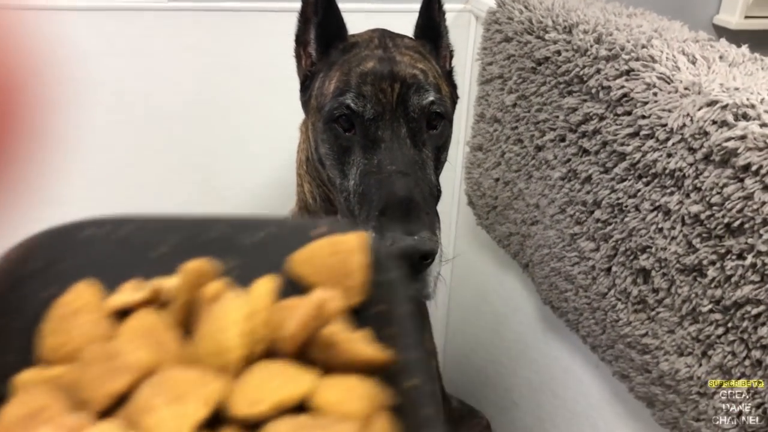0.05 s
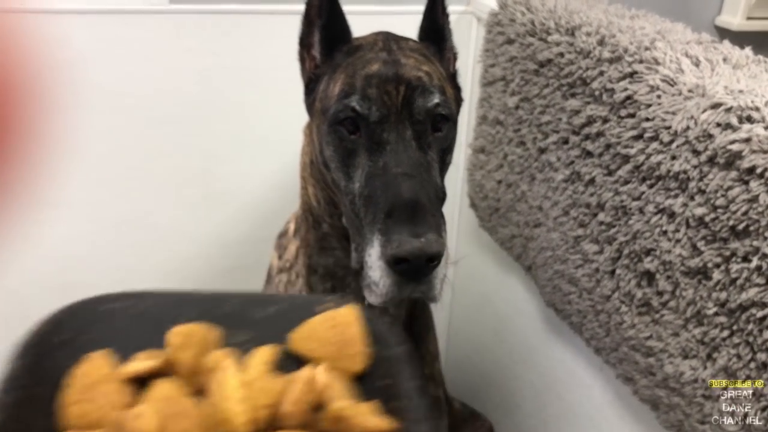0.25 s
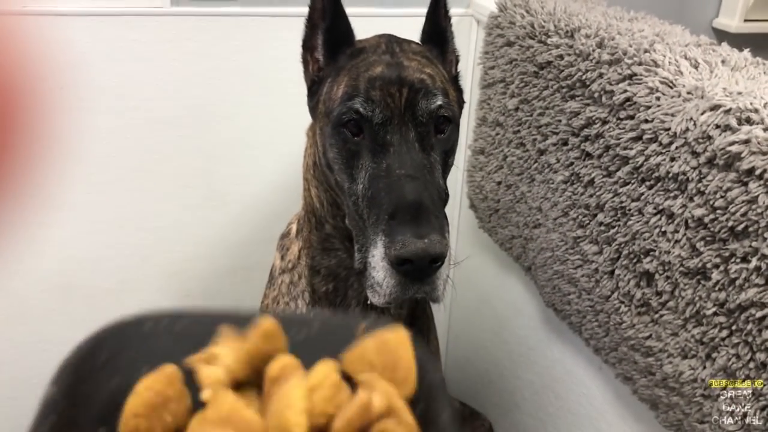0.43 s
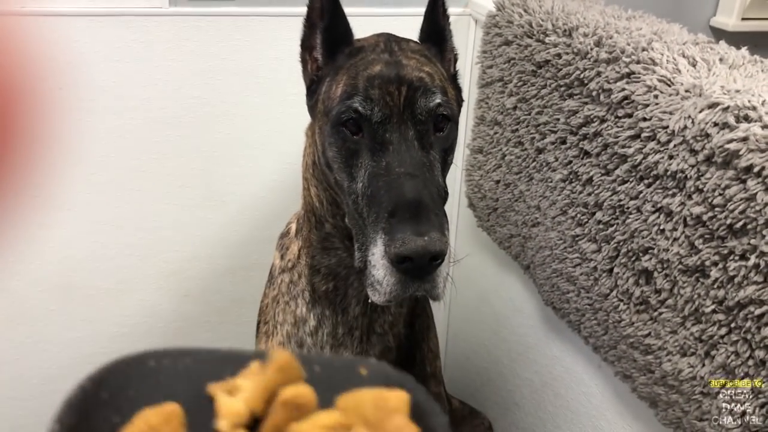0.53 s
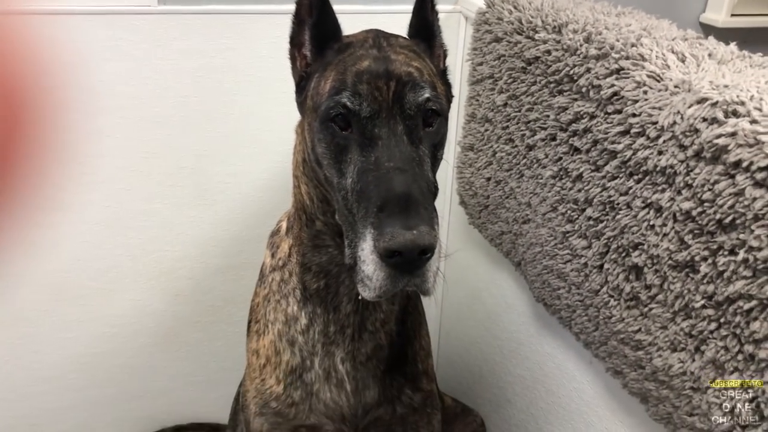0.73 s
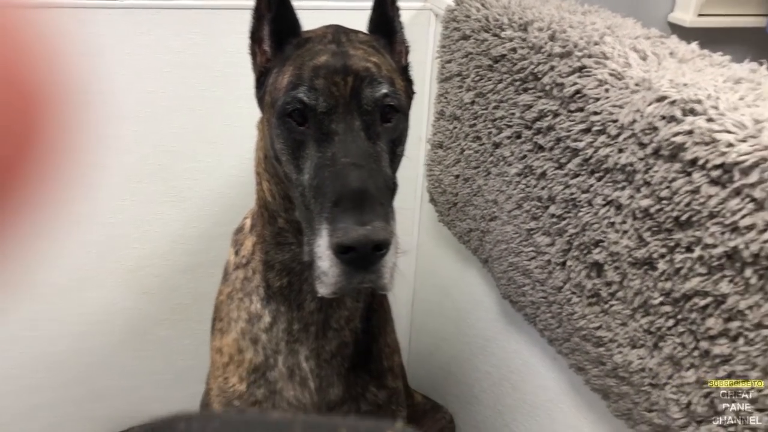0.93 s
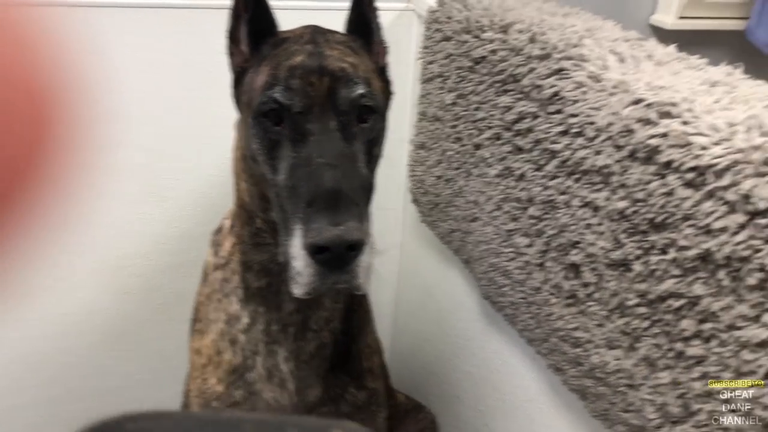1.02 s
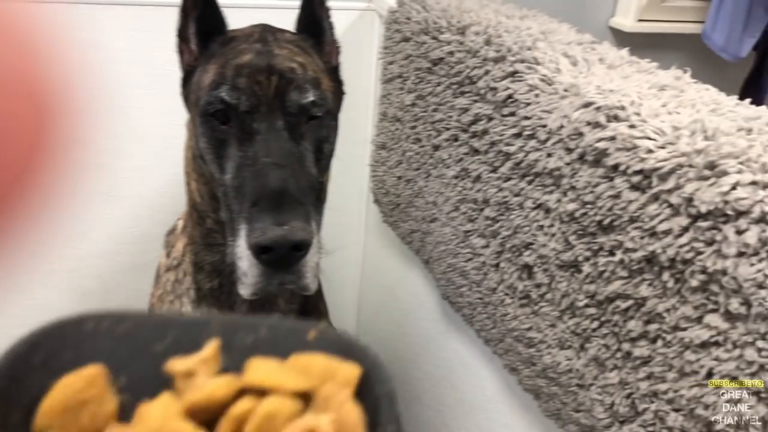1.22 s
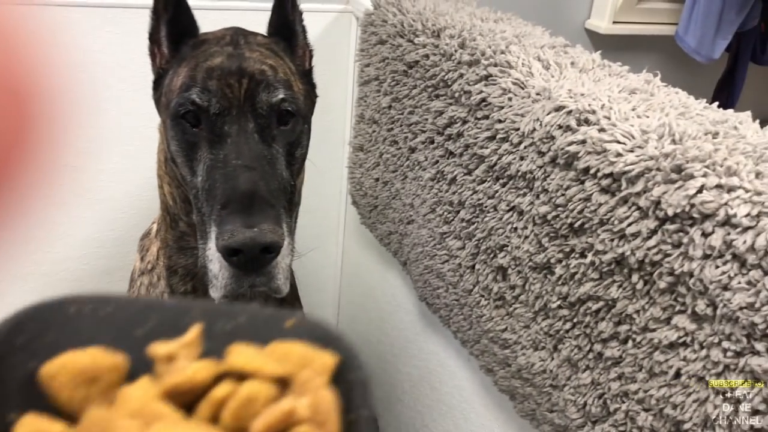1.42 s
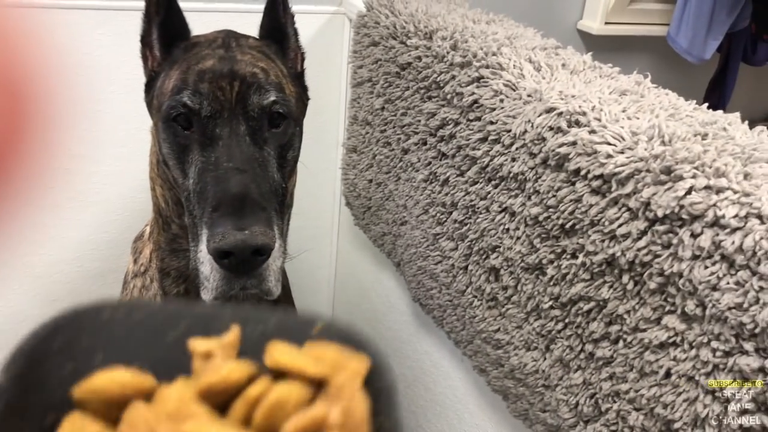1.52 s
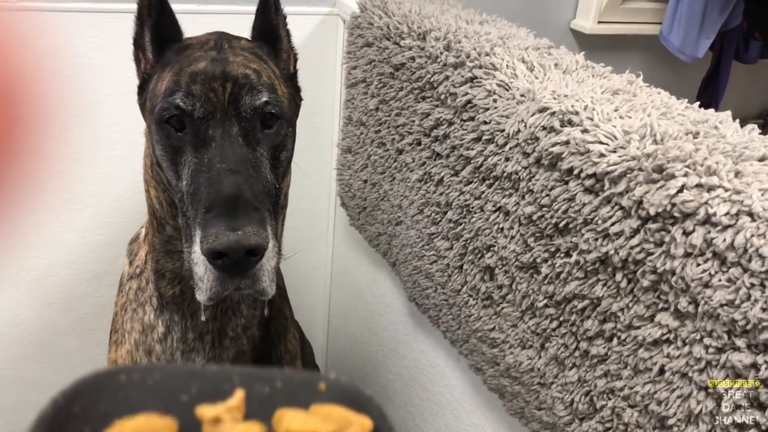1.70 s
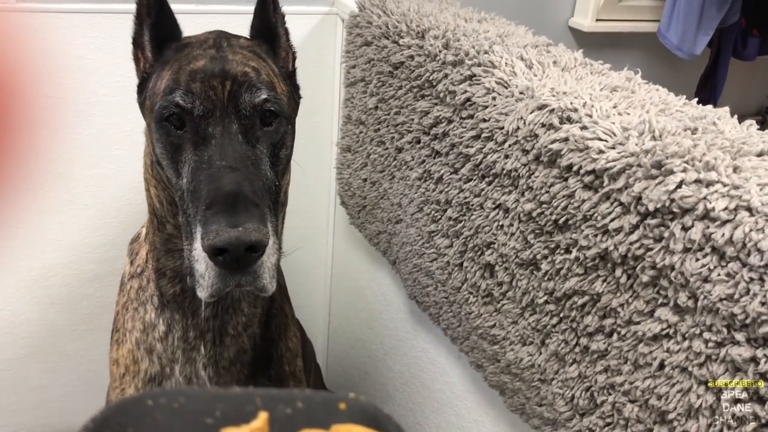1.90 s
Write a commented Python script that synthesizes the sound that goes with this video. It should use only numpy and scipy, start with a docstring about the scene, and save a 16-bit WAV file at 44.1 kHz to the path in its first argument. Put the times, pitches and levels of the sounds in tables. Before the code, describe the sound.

Dry dog kibble rattles from a plastic scoop, close up in a small quiet room. Single light knocks come at about 0.1 and 0.2 s, then a dense, crunchy rush from 0.3 to 0.6 s, loudest near 0.44. Smaller clusters follow around 0.82 and 0.98, then sparse taps, a little group near 1.58 and a last click at 1.79, over faint air and hum.

```python
"""Still room air and a faint mains hum, each at a steady level, lie under the whole sound.
A few pieces of dry dog kibble knock first, then a dense rush tumbles from a plastic scoop; strays follow to the end.
Each landing is a damped wave of a few cycles plus a short noise crack and a chatter; grazing pieces only tick.
Many tiny knocks and gritty clicks rustle as the heap slides, and the scoop rumbles and now and then bumps dully.
Each sound of kibble or scoop leaves a short tail of decaying noise, as in a small, quiet room."""
import sys
import numpy as np
from scipy import signal
from scipy.fft import rfft, irfft
from scipy.io import wavfile
from scipy.ndimage import uniform_filter1d

SR = 44100
rng = np.random.default_rng(int(sys.argv[2]) if len(sys.argv) > 2 else 0)


def transcribe(u):
    """Save the signal u as a 16-bit wav file named by the first command-line argument.

    u: samples, shape (n,) or (channels, n), limited to [-1, 1]; the rate is SR.
    q: integer samples, one column per channel.
    """
    v = np.clip(np.atleast_2d(u).T, -1, 1)
    q = np.round(v * 32767).astype(np.int16)
    wavfile.write(sys.argv[1], SR, q)


N = 85995  # length [samples]
CRACK_RISE_S = 0.0008  # time for a crack to reach full strength; the rustle's clicks take half of it


def undb(db):
    """Turn decibels into a factor for the wave's height."""
    return 10 ** (np.asarray(db) / 20)


def unit(x):
    """Scale to an average strength (rms) of 1."""
    return x / np.sqrt(np.mean(x ** 2))


def colour(x, points):
    """Make some pitches stronger or weaker, following (frequency [Hz], level [dB]) points."""
    hz, db = np.array(points, float).T
    frequency = np.maximum(np.fft.rfftfreq(len(x), 1 / SR), 1)
    gain = undb(np.interp(np.log(frequency), np.log(hz), db))
    return irfft(rfft(x) * gain, len(x))


def noise(points):
    """Hiss with a chosen spectrum and an rms of 1."""
    return unit(colour(rng.standard_normal(N), points))


def high_pass(x, hz, order):
    """Weaken everything below a frequency; a higher order cuts more steeply."""
    return signal.sosfilt(signal.butter(order, hz, "high", fs=SR, output="sos"), x)


def add(out, start_s, sound):
    """Mix a short sound in at its time."""
    i = int(np.clip(start_s * SR, 0, N - 1))
    out[i:i + len(sound)] += sound[:N - i]


def swell(rise_s, roundness=2):
    """Strength of a contact: it rises to 1 in rise_s, then dies away; more roundness makes it narrower."""
    u = np.arange(int(10 * rise_s * SR) + 2) / SR / rise_s
    return (u * np.exp(1 - u)) ** roundness


def blows(rows, rise_cycles, roundness=2, pitch_drop=0):
    """Heavily damped waves, strongest at each (time [s], level [dB], pitch [Hz]), all in the same phase.

    The pitch may sink: it passes the listed value when the blow is strongest.
    """
    out = np.zeros(N)
    for (s, db, hz), cycles in zip(rows, np.broadcast_to(rise_cycles, len(rows))):
        rise_s = cycles / hz
        env = swell(rise_s, roundness)
        settling = np.exp(-np.arange(len(env)) / SR / rise_s) - np.exp(-1)
        turns = np.cumsum(hz * (1 + pitch_drop * settling)) / SR
        wave = np.sin(2 * np.pi * (turns - turns[np.argmax(env)]))
        add(out, s - rise_s, undb(db) * env * wave)
    return out


def background():
    """Still room air is soft noise; the mains hum is one steady low tone."""
    # spectrum of the air: (frequency [Hz], relative level per Hz [dB])
    air_table = [(20, -38), (35, -14.5), (50, -18), (78, -4), (170, -11.5), (300, -13.5), (600, -18.5),
                 (1300, -30.5), (4200, -35), (6200, -37), (15000, -41.5), (16000, -46)]
    air_db, hum_hz, hum_db = -68.5, 60.3, -73.5  # both levels are rms
    t = np.arange(N) / SR
    hum = np.sqrt(2) * np.sin(2 * np.pi * hum_hz * t)
    return undb(air_db) * noise(air_table) + undb(hum_db) * hum


def room(x):
    """Walls send back a dense, fading tail; its treble lasts a little longer than the rest."""
    # colour of the wall echoes: (frequency [Hz], relative level per Hz [dB])
    walls_table = [(100, -11), (400, 9), (680, -11), (850, 4), (1150, 0.5), (1480, 2), (1850, -5),
                   (3000, 1), (6000, -1.5), (15000, 0)]
    tail_db, gap_s = -16, 0.001  # the gap keeps the first echoes behind the direct sound
    low_t60_s, treble_t60_s = 0.25, 0.35  # time to fade by 60 dB
    t = np.arange(N) / SR
    echoes = noise(walls_table) * (t > gap_s)
    low = signal.sosfilt(signal.butter(1, 3500, fs=SR, output="sos"), echoes)
    treble = echoes - low
    tail = low * undb(-60 * t / low_t60_s) + treble * undb(-60 * t / treble_t60_s)
    tail /= np.sqrt(np.sum(tail ** 2))
    return undb(tail_db) * signal.fftconvolve(x, tail)[:N]


def scoop(pieces):
    """The plastic rumbles faintly under the moving pieces, and bumps dully in the hand."""
    # low body of the plastic: (frequency [Hz], relative level per Hz [dB])
    body_table = [(25, -57), (60, -36), (130, 0), (300, -3.5), (450, -2.5), (700, 1), (2000, -53)]
    # bumps in the hand: (time [s], level [dB], pitch [Hz], rise time [cycles])
    bumps = np.array([(0.3435, -44.5, 300, 0.7), (0.3505, -58, 169, 0.9), (0.7664, -45, 305, 0.62),
                      (0.775, -58, 218, 0.74), (1.4087, -50, 97, 0.89)])
    rumble_db, smear_s = -22.5, 0.041  # level against the pieces; how long it smears their blows
    shaking = np.sqrt(np.abs(uniform_filter1d(pieces ** 2, int(smear_s * SR))))
    rumble = undb(rumble_db) * shaking * noise(body_table)
    return rumble + blows(bumps[:, :3], bumps[:, 3])


def rustle():
    """Many tiny knocks and gritty clicks swell and fade as the heap slides."""
    # how much the heap slides: (time [s], rustle level before its trim [dB], grit level before its trim [dB])
    slide_table = [(0, -80.5, -105), (.13, -82, -99), (.17, -60.5, -73.5), (.2, -92, -101),
                   (0.292, -49.5, -66.5), (.33, -61.5, -78), (.37, -57.5, -67.5), (.47, -54, -67.5),
                   (0.563, -49.5, -65), (0.612, -68, -82), (0.702, -55.5, -70.5), (0.738, -71, -87),
                   (.8, -66, -79.5), (0.823, -56, -58.5), (0.849, -69, -84), (.925, -71.5, -83),
                   (0.961, -55, -73), (1.05, -88, -84), (1.37, -76.5, -84), (1.54, -66.5, -83),
                   (1.58, -65, -75), (1.65, -60.5, -76.5), (1.72, -74.5, -109), (1.95, -100, -103)]
    # sound of the crumbs: (frequency [Hz], relative level per Hz [dB])
    grit_table = [(1000, -9), (2500, 7), (4500, 0), (6500, -2.5), (9000, -8.5), (12000, -9), (16000, -10)]
    rustle_trim_db, grit_trim_db = -1, 4.5
    grains_per_s, grain_hz, rise_cycles = 600, 1366, 1.1
    spread_octaves, spread_db = 0.31, 3  # how much grains differ in pitch and level (standard normal draws)
    count = int(grains_per_s * N / SR)
    times = rng.uniform(0, N / SR, count)
    size, pitch = rng.standard_normal((count, 2)).T
    db = spread_db * np.clip(size, -2, 2)
    hz = grain_hz * 2 ** (spread_octaves * pitch)
    grains = blows(np.c_[times, db, hz], rise_cycles)

    # each tiny knock also sets off a click of grit
    contacts = np.bincount((times * SR).astype(int), undb(db), N)
    grit = np.convolve(contacts, swell(CRACK_RISE_S / 2, 0.52))[:N] * noise(grit_table)

    at, rustle_db, grit_db = np.array(slide_table).T
    t = np.arange(N) / SR
    rustle_gain = undb(rustle_trim_db + np.interp(t, at, rustle_db))
    grit_gain = undb(grit_trim_db + np.interp(t, at, grit_db))
    return rustle_gain * unit(grains) + grit_gain * unit(grit)


def cracks(rows, spectrum):
    """A short bright burst at each (time [s], level [dB]), where two crusts meet and crumble."""
    crumble_db, crumble_rise_s = -29, 0.0034  # the weaker, longer crumbling around each crack
    out, crust = np.zeros(N), noise(spectrum)
    env = undb(crumble_db) * swell(crumble_rise_s, 0.33)
    snap = swell(CRACK_RISE_S, 3.5)[:len(env)]
    env[:len(snap)] += snap
    for s, db in rows:
        burst = env * np.take(crust, int(s * SR) + np.arange(len(env)), mode="wrap")
        burst *= np.sqrt(np.sum(env ** 2) / np.sum(burst ** 2))  # same energy for every burst
        add(out, s - CRACK_RISE_S, undb(db) * burst)
    return out


def rattles(rows):
    """After each knock (time [s], level [dB], pitch [Hz]) the piece chatters briefly around its own pitch."""
    chatter_db, fade_s = -19, 0.002  # level against the row's level; time constant of the fading noise
    width = 0.81  # natural logarithm of upper over lower band edge
    out, size = np.zeros(N), 1024
    env = np.exp(-np.arange(size) / SR / fade_s)
    for (s, db, hz), chance in zip(rows, rng.standard_normal((len(rows), size))):
        edges = hz * np.exp(np.array([-.5, .5]) * width)
        band = signal.butter(2, edges, "band", fs=SR, output="sos")
        chatter = signal.sosfilt(band, chance * env)
        chatter *= np.sqrt(np.sum(env ** 2) / np.sum(chatter ** 2))
        add(out, s, undb(db + chatter_db) * chatter)
    return out


def kibble():
    """Landing pieces knock, crack and chatter; grazing ones only tick."""
    # landing pieces: (time [s], knock level before its trim [dB], knock pitch [Hz],
    # crack level before its trim [dB], rise time of the knock [cycles])
    landing_table = [(0.08943, -30.5, 1350, -64, 0.6), (0.21183, -39.5, 1620, -62, 0.76),
                     (0.21446, -29.0, 1260, -60, 1.62), (0.222, -30.5, 1290, -66, 0.95),
                     (0.28461, -35.5, 1880, -59, 1.13), (0.30397, -37.0, 1270, -56, 1.77),
                     (0.30719, -28.0, 1590, -48, 0.6), (0.31521, -38.0, 1400, -57, 0.79),
                     (0.3459, -34.0, 2190, -56, 1.24), (0.34846, -24.5, 1190, -54, 1.57),
                     (0.36243, -35.0, 1580, -62, 0.6), (0.36398, -42.5, 1370, -47, 3.2),
                     (0.3823, -35.5, 1400, -53, 0.85), (0.4067, -33.5, 1710, -58, 1.48),
                     (0.41759, -23.5, 1220, -42, 1.27), (0.41951, -30.0, 1960, -54, 0.6),
                     (0.42357, -36.5, 1260, -66, 2.15), (0.43141, -16.5, 2090, -35, 0.68),
                     (0.43248, -28.0, 2140, -38, 1.71), (0.43583, -25.5, 2900, -35, 0.6),
                     (0.43956, -20.0, 2100, -27, 0.94), (0.44544, -34.5, 2240, -66, 1.55),
                     (0.44926, -46.0, 1130, -47, 3.2), (0.46551, -39.5, 1380, -66, 1.16),
                     (0.48293, -41.0, 1130, -64, 3.2), (0.48453, -38.0, 2570, -51, 2.01),
                     (0.48561, -24.5, 1240, -54, 1.65), (0.48689, -20.5, 1790, -66, 0.66),
                     (0.48894, -33.0, 1230, -57, 0.68), (0.49357, -41.5, 1130, -66, 1.63),
                     (0.50039, -39.5, 1440, -55, 2.73), (0.5151, -31.0, 2220, -43, 1.18),
                     (0.51984, -27.0, 1870, -47, 0.6), (0.52192, -35.0, 1100, -46, 0.93),
                     (0.52518, -37.0, 1160, -54, 1.12), (0.53607, -30.0, 1520, -62, 0.95),
                     (0.54125, -41.0, 1370, -40, 2.13), (0.54662, -37.0, 1480, -62, 0.6),
                     (0.556, -41.0, 1360, -58, 2.39), (0.55898, -45.0, 1380, -52, 2.46),
                     (0.57527, -39.5, 1970, -65, 1.02), (0.58409, -35.5, 2030, -53, 0.6),
                     (0.63121, -36, 2300, -46, 0.6), (0.63413, -38.0, 1230, -63, 1.79),
                     (0.64534, -44.5, 1120, -66, 1.8), (0.68727, -31, 1150, -46, 1.25),
                     (0.69919, -48.0, 1290, -55, 1.17), (0.70349, -42.5, 1060, -52, 0.85),
                     (0.75481, -33.5, 1320, -62, 0.9), (0.81538, -42.5, 1370, -56, 1.17),
                     (0.82307, -28.5, 2290, -40, 0.6), (0.82482, -22.5, 2330, -66, 0.79),
                     (0.82607, -27.5, 1780, -34, 0.95), (0.82768, -33.5, 1540, -45, 1.73),
                     (0.83827, -34.5, 2000, -66, 0.75), (0.86715, -44.5, 1990, -62, 1.01),
                     (0.88101, -30.0, 1380, -55, 0.6), (0.90654, -41.0, 1190, -56, 1.81),
                     (0.9756, -39.5, 1400, -66, 0.74), (0.98344, -24.0, 2030, -44, 0.71),
                     (1.02037, -44.0, 1610, -65, 0.91), (1.02489, -43.5, 1210, -66, 0.6),
                     (1.07862, -46.5, 1630, -66, 0.82), (1.10053, -37.0, 1820, -62, 0.82),
                     (1.10517, -36.5, 1560, -66, 0.6), (1.10937, -41.0, 1240, -59, 0.73),
                     (1.17261, -36.5, 2130, -66, 0.96), (1.1747, -32.5, 1510, -61, 0.81),
                     (1.23482, -44.5, 1790, -66, 0.95), (1.24277, -30.5, 1760, -60, 0.99),
                     (1.24594, -30.5, 2590, -47, 1.14), (1.24658, -33.0, 1950, -47, 0.6),
                     (1.28956, -43.0, 1700, -66, 1.21), (1.31353, -36.5, 1980, -66, 0.93),
                     (1.31436, -36.0, 1140, -66, 0.75), (1.37245, -42.0, 1710, -61, 1.41),
                     (1.37649, -40.5, 2090, -66, 0.6), (1.46073, -36.5, 1260, -65, 0.79),
                     (1.50539, -37.0, 1990, -64, 0.81), (1.58037, -27.5, 1480, -59, 1.08),
                     (1.58251, -26.0, 1790, -50, 0.6), (1.58389, -39.0, 1450, -56, 2.11),
                     (1.60344, -40.5, 1420, -64, 1.24), (1.64239, -45.0, 1580, -65, 1.76),
                     (1.64479, -44.5, 2750, -52, 1.3), (1.66506, -30.0, 2330, -50, 0.73),
                     (1.78987, -29.5, 2120, -40, 0.95)]
    # pieces that only graze each other: (time [s], level before its trim [dB])
    grazing_table = [(0.1686, -51), (0.2997, -34), (0.3094, -47), (0.3643, -50), (0.3716, -47),
                     (0.4343, -44), (0.4387, -42), (0.4541, -39), (0.5032, -37), (0.6234, -53),
                     (0.7619, -45), (0.8225, -37), (0.8258, -32), (0.9045, -41), (0.9467, -45),
                     (0.9521, -47), (1.5242, -46.5), (1.5832, -62), (1.5907, -50), (1.6406, -44.5),
                     (1.6589, -40.5)]
    # sound of a crack, then of a tick: (frequency [Hz], relative level per Hz [dB])
    crack_table = [(700, -60), (1600, 0), (2700, 8.5), (3800, 1.5), (4700, 2), (6500, -3.5), (8500, -15),
                   (11000, -24.5), (16000, -22.5)]
    tick_table = [(1000, -25), (2500, 16.5), (4200, 11), (6500, 5), (8500, 1), (12000, 2), (16000, -9)]
    knock_trim_db, crack_trim_db, tick_trim_db = -0.5, -3.5, -10.5
    roundness = 4.02
    pitch_drop = 0.69  # total fall as a share of the listed pitch, as the contact settles
    s, db, hz, crack_db, cycles = np.array(landing_table).T
    knocks = blows(np.c_[s, db + knock_trim_db, hz], cycles, roundness, pitch_drop)
    crisp = cracks(np.c_[s, crack_db + crack_trim_db], crack_table)
    ticks = undb(tick_trim_db) * cracks(grazing_table, tick_table)
    return knocks + rattles(np.c_[s, db, hz]) + crisp + ticks


def scene():
    """Kibble and scoop sound in the room; small pieces give off little bass, the tiniest even less."""
    # the hollow of the scoop colours landings and ticks: (frequency [Hz], level [dB])
    hollow_table = [(450, 0.5), (950, 1), (1150, 1), (1400, 2.5), (1700, 2), (2100, -2), (2600, 1.5),
                    (2900, -3), (3500, 0), (3900, -2.5), (4300, 2), (5200, -2.5), (6300, 0.5), (10000, 0)]
    falling = high_pass(colour(kibble(), hollow_table), 600, order=2)
    sliding = high_pass(rustle(), 787, order=5)
    pieces = falling + sliding
    near = pieces + scoop(pieces)
    return (near + room(near) + background())[None]


def record(dry):
    """The phone, close by, steeply cuts the treble above 16.2 kHz."""
    return signal.sosfilt(signal.ellip(10, .1, 70, 16200, fs=SR, output="sos"), dry)


dry = scene()
out = record(dry)
transcribe(out)
```